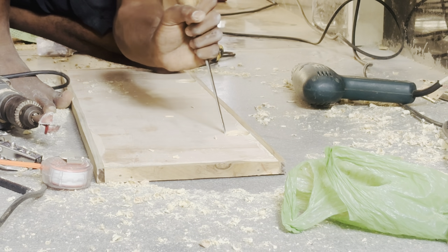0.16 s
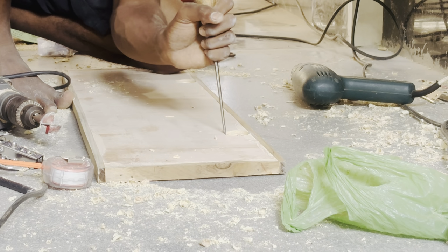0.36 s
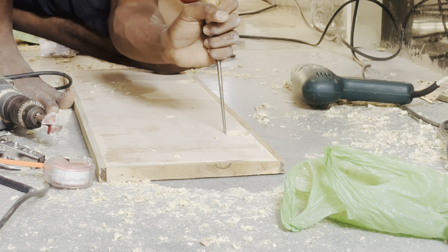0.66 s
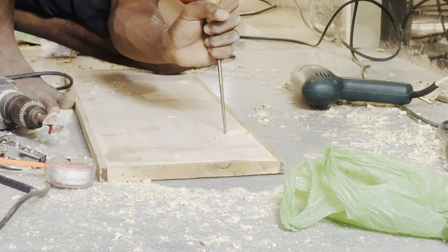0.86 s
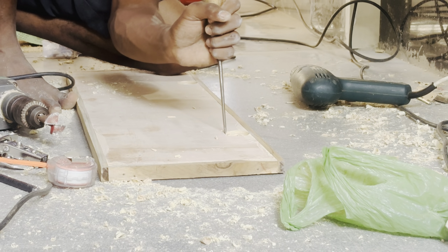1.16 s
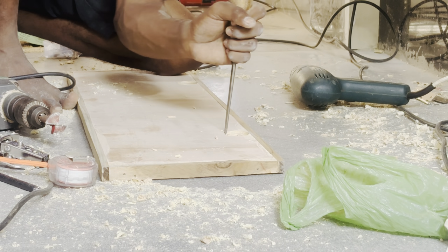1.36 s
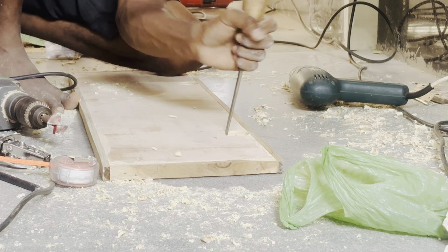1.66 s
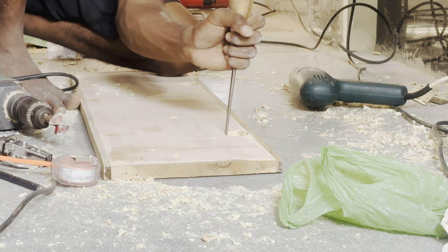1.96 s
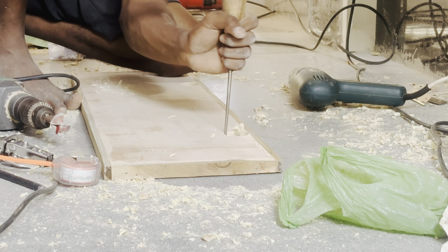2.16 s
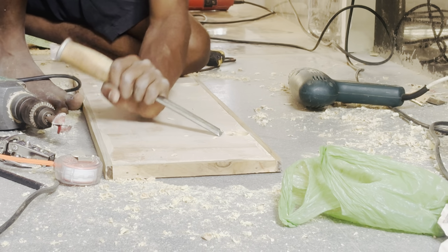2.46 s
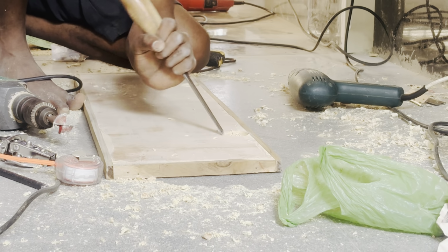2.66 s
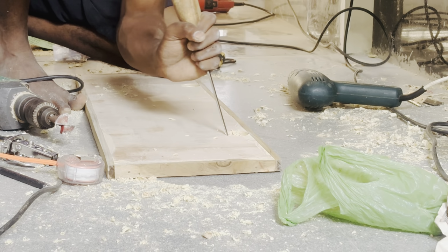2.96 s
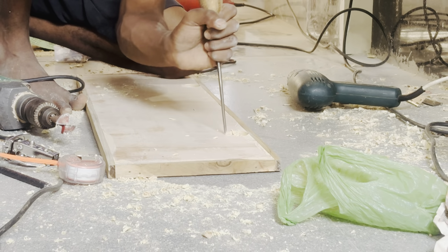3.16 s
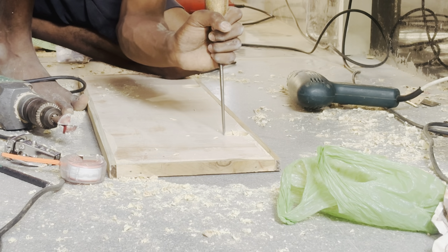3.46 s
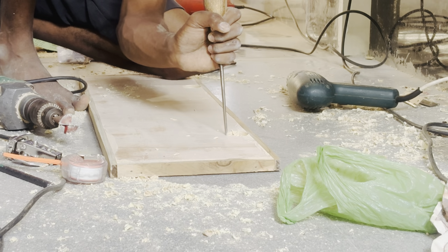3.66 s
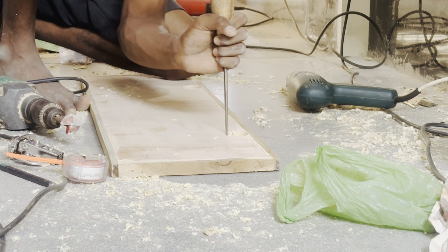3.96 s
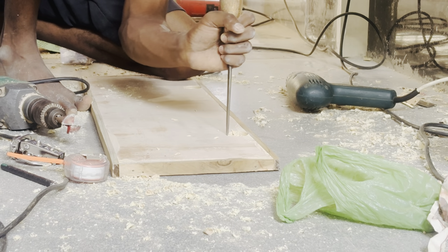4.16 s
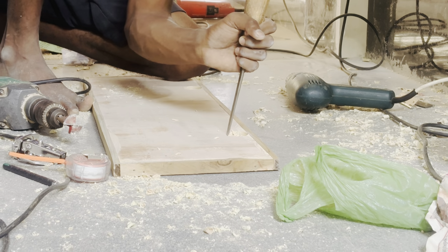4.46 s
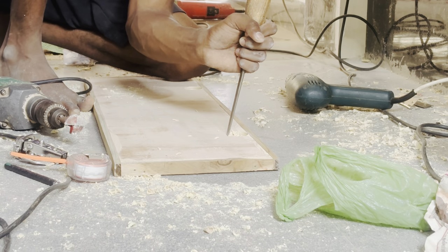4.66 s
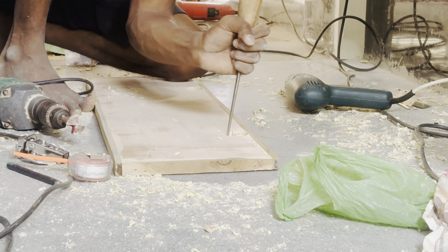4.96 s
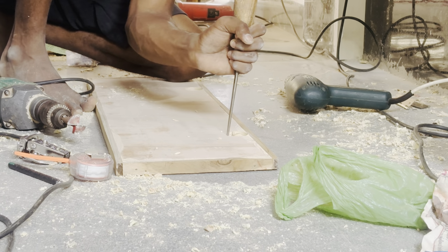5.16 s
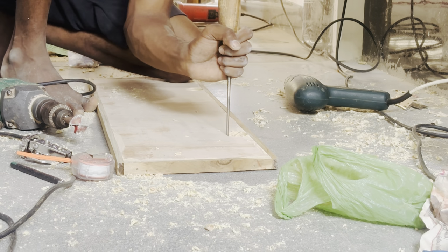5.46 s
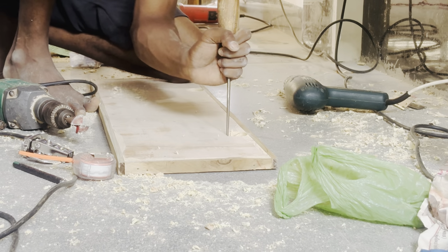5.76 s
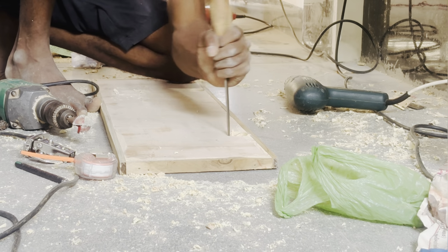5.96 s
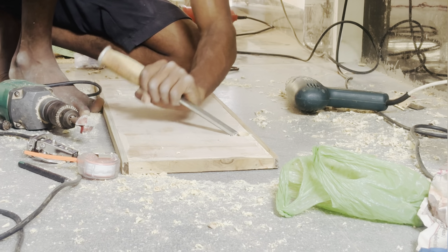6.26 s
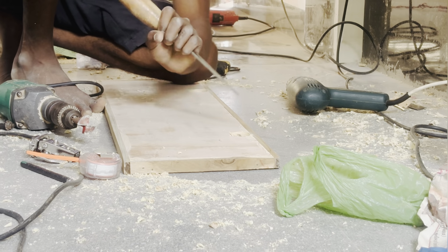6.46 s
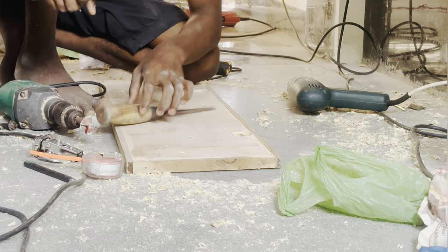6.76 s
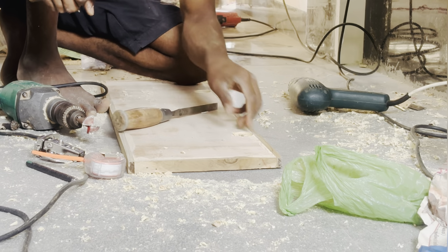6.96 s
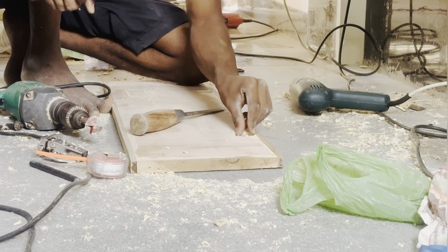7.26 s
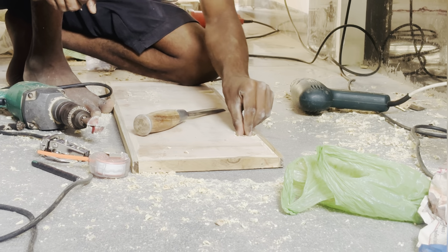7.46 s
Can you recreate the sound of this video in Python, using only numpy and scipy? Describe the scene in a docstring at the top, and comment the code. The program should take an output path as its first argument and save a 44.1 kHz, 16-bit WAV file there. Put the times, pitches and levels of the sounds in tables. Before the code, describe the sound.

A hammer cracks on a wooden chisel handle in a bare echoing room, two blows then three, before the chisel is dropped with a clinking knock.

```python
"""Hammer and chisel in a bare room

A hammer drives a wooden-handled chisel into a board on the concrete floor of a bare, echoing room.
Each blow is a short crackle that sets off a crack on the handle, a thump of the board and splitting fibres.
The chisel is also set, dropped and nudged: wood knocks and its blade rings as short damped tones.
Faint rasping, made of noise played at the speed of each stroke, carries from further off.
Steady filtered noise makes the low rumble, and noise that dies away makes the room's echo."""
import sys
import numpy as np
from scipy import signal
from scipy.fft import rfft, irfft, next_fast_len
from scipy.io import wavfile
from scipy.ndimage import map_coordinates

SR = 44100
rng = np.random.default_rng(int(sys.argv[2]) if len(sys.argv) > 2 else 0)


def transcribe(signal):
    """Save signal, clipped to [-1, 1], as a 16-bit WAV file at the path in sys.argv[1]."""
    frames = np.atleast_2d(signal).T
    limited = np.clip(frames, -1, 1)
    pcm = np.round(limited * 32767).astype(np.int16)
    wavfile.write(sys.argv[1], SR, pcm)


N = 335160

# Hammer blows: start_s, board_db, fibres_db, handle_db, crack_db, wood_pitch_ratio, direct_db, ping_hz, ping_db
BLOWS = [(1.6620, 0, -10, -0.5, 1, 0.94, 2, 3290, -2.5), (2.1079, 7, 5.5, 5.5, 5.5, 1.005, 1, 4390, -2.5),
         (4.8240, 8, -0.5, 6.5, 7, .98, 1, 3880, 9), (5.2548, 7.5, -3.5, 10, 8, 1.034, -3, 4160, -7),
         (5.6925, 8.5, 9, 8, 6.5, 0.98, -4.5, 3520, -10.5)]
# The chisel is set, dropped and nudged: start_s, soft_thud_db, wood_knock_db, blade_ring_db, tick_db
KNOCKS = [(.077, -31.5, -37, -58, -68), (.170, -62, -42.5, -45.5, -45), (3.425, -53, -49.5, -52, -51),
          (6.7612, -12.5, 4.5, -35, -34), (6.7855, -30, -11.5, -6, -24), (6.843, -41, -23.5, -34, -31),
          (6.865, -38, -29, -37, -32), (7.541, -58, -51, -55, -46)]
# Strokes of the distant rasping: start_s, length_s, friction_db, squeal_db, pitch_ratio
STROKES = [(3.49, .34, -67.5, -86, .84), (3.85, .13, -63.5, -82, .92), (3.965, .22, -54.5, -51, 1),
           (4.28, .13, -60, -73, .95), (4.4, .41, -54.5, -58.5, .99), (6.31, .42, -58.5, -70, .93),
           (7.26, .32, -56.5, -58, .92)]

# Resonances of the board, the handle, the wood in a chisel knock, and the free blade:
# pitch_hz, width_hz, level_db
BOARD_MODES = [(130, 75, -14), (255, 41, -13.5), (420, 30, -8), (577, 180, -1.5), (640, 81, 1),
               (716, 65, -0.5), (957, 90, -2)]
HANDLE_MODES = [(2090, 430, -1), (2510, 500, -3), (3300, 790, 0), (3900, 600, -4.5), (4440, 230, -6.5)]
KNOCK_WOOD_MODES = [(562, 110, -9.5), (718, 62, -1), (960.3, 70, 2), (1225, 135, -13), (1475, 140, -9.5),
                    (1960, 240, -9), (2440, 370, -11.5), (3200, 300, -15), (4300, 300, -24.5)]
BLADE_MODES = [(3500, 170, 0), (4250, 150, -10), (5230, 190, -2), (5950, 140, -7), (6700, 45, -2),
               (6970, 120, -8), (7600, 150, -15), (8560, 110, -5), (9400, 150, -17), (10300, 100, -8),
               (11200, 100, -21), (12050, 110, -21), (12750, 120, -20), (13800, 120, -22),
               (14600, 150, -23)]

# Tone of splitting fibres: pitch_hz, level_db
FIBRES_TONE = [(100, -36), (500, -19.5), (850, -6), (1100, 0), (1600, -4), (2200, -8), (3200, -21),
               (8000, -31.5)]
# Tone of the crack where hammer meets handle: pitch_hz, level_db
CRACK_TONE = [(100, -22.5), (1500, -9), (4500, 1.5), (7000, -2), (9500, -5.5), (12500, -7), (15000, -9),
              (17000, -21)]
# Tone of the handle landing softly: pitch_hz, level_db
THUD_TONE = [(60, -24), (180, -9.5), (300, 0.5), (450, 1), (800, -13), (2000, -48), (8000, -60)]
# Tone of the blade ticking on the board: pitch_hz, level_db
TICK_TONE = [(100, -48), (1500, 3), (3500, 10), (4500, 9), (5600, -11.5), (7000, -2.5), (8800, -18),
             (10500, -67), (13000, -5), (16000, 2)]
# Tone of the rasping friction: pitch_hz, level_db
FRICTION_TONE = [(300, -27.5), (700, -18), (900, -16), (1080, -8), (1250, -14), (1650, -9), (2100, -1),
                 (2500, -17.5), (3000, -25.5), (3600, -19.5), (4600, -24), (7000, -27), (10000, -33),
                 (13000, -33), (16000, -43.5)]
# Tone of the squeal in a rasping stroke: pitch_hz, level_db
SQUEAL_TONE = [(500, -39.5), (960, -24.5), (1040, -9), (1090, 1), (1170, -26), (1900, -26), (2080, -8.5),
               (2150, -1), (2240, -21), (3300, -39.5), (3600, -20), (3900, -41.5), (9000, -53)]
# Tone of the building's rumble and faint hiss: pitch_hz, level_db
RUMBLE_TONE = [(20, -36.5), (40, -23.5), (65, 3.5), (90, -1), (150, -10), (300, -17), (600, -17.5),
               (1200, -25), (3000, -30), (6000, -37.5), (10000, -41), (14000, -44), (17000, -53)]

# Tone of the room's echo: pitch_hz, level_db
ECHO_TONE = [(40, -6.5), (128, 0.5), (195, -9), (265, -2.5), (400, -5.5), (800, -3), (1500, -0.5),
             (3000, -2), (5000, -1.5), (7000, -5.5), (10000, -4), (14000, -7.5), (16000, -11.5)]
# Time the echo takes to fall by 60 dB: pitch_hz, t60_s
ROOM_T60 = [(80, 2.1), (210, 1.2), (560, 1.1), (1200, 1.087), (4000, .98), (7000, 0.83), (10000, 0.61),
            (15000, .52)]
# First echoes off floor, ceiling and walls, before the echo tone is applied: delay_s, level_db
FIRST_ECHOES = [(.0062, -23.5), (0.014, -14.5), (0.0157, -10), (.0265, -24), (.047, -18), (.105, -21)]
# Standing waves of the room: pitch_hz, level_db, t60_s
STANDING_WAVES = [(127, -4.5, 1.9), (269, -2, 0.36), (602, -5, .8), (731, 0, .95), (787, 0, .9),
                  (1122, -1, 0.47), (1374, -5.5, .8), (1478, 0.5, 0.3), (1529, -1, .8), (1658, -1, 0.71),
                  (1682, -3.5, 0.66), (2050, -2.5, 0.98), (2127, -2, .9)]
# Strength of the left-right difference (side) against the shared part (mid): pitch_hz, side_minus_mid_db
WIDTH = [(60, -20), (150, -14), (350, -5.5), (700, -2), (1400, -2.5), (2100, -11), (3500, -26.5),
         (15000, -30.5)]
# Phase lead of the left microphone over the right: pitch_hz, lead_radians
PORT_PHASE = [(100, 0), (2000, 0), (2800, .2), (4000, .05), (5100, 0), (5600, -.8), (6500, -.05),
              (7400, -.2), (10050, -3.14), (12400, -6.1), (13200, -6.5), (15200, -9.3)]

TOP_HZ = 16300  # treble cut
STROKE_ATTACK_S, STROKE_RELEASE_S = .055, .22
STROKE_END_SPEED = .6  # share of the top speed left when the push ends
PITCH_SAG = .04  # share of the pitch lost at standstill
SQUEAL_POWER = 4  # the squeal grows with this power of the speed
TIME = np.arange(N) / SR
HIT_TIME, ROOM_TIME = TIME[:SR // 2], TIME[:2 * SR]
GRID_HZ = np.arange(10, SR / 2, 10)


def blow(board_db, fibres_db, handle_db, crack_db, ratio):
    """The hammer cracks on the handle; the edge thumps the board and splits fibres."""
    parts = [
        (board_db, resonant(BOARD_MODES, ratio)),
        (fibres_db, broad(FIBRES_TONE)),
        (handle_db, resonant(HANDLE_MODES, ratio)),
        (crack_db, broad(CRACK_TONE)),
    ]
    return excite(contact(t60=.018, rise=.0004), parts)


def ping(hz, t60=.018):
    """The steel shank rings for a moment before the hand and the wood damp it."""
    return ring([(hz, 0, t60)], HIT_TIME)


def knock(thud_db, wood_db, blade_db, tick_db):
    """The loose chisel meets the board: the handle lands softly, the free blade clinks at once."""
    wood_parts = [(thud_db, broad(THUD_TONE)), (wood_db, resonant(KNOCK_WOOD_MODES))]
    steel_parts = [(blade_db, resonant(BLADE_MODES)), (tick_db, broad(TICK_TONE))]
    wood = excite(contact(t60=.031, rise=.0018), wood_parts)
    steel = excite(contact(t60=.018, rise=.00036), steel_parts)
    return wood + steel


def contact(t60, rise, count=6):
    """A short dense crackle (times in s), evened out so that it has no pitch of its own."""
    t = HIT_TIME[:int(t60 * SR)]
    crackle = rng.standard_normal(len(t)) * fade(t, t60) * (1 - np.exp(-t / rise))
    for _ in range(count):
        # keep the timing (phase) but make all pitches equally strong, then trim
        phase = np.angle(rfft(crackle, 4 * len(t)))
        crackle = irfft(np.exp(1j * phase))[:len(t)]
    return unit(np.pad(crackle, (0, len(HIT_TIME) - len(t))))


def excite(force, parts):
    """A contact force drives several (level dB, power spectrum) parts at once."""
    power = sum(undb(db) ** 2 * part for db, part in parts)
    return colour(force, np.c_[GRID_HZ, 10 * np.log10(power)])


def resonant(modes, ratio=1):
    """Power spectrum (mean one) of damped resonances, with their pitch scaled by ratio."""
    hz = GRID_HZ / ratio
    power = 0
    for mode_hz, width_hz, db in modes:
        detuning = (hz ** 2 - mode_hz ** 2) / (hz * width_hz)
        power = power + undb(db) ** 2 / (1 + detuning ** 2)
    return power / power.mean()


def broad(points):
    """Power spectrum (mean one) of a sound spread over many pitches."""
    power = undb(lookup(points, GRID_HZ)) ** 2
    return power / power.mean()


def rasp(flutter_db=3.0, flutter_hz=30):
    """Distant strokes rub fast, then slow: level and pitch follow speed, and the squeal peaks when fastest."""
    out = np.zeros(N)
    friction_noise, squeal_noise = noise(FRICTION_TONE), noise(SQUEAL_TONE)
    for start, length, friction_db, squeal_db, ratio in STROKES:
        corners = start + np.array([0, STROKE_ATTACK_S, length, length + STROKE_RELEASE_S])
        speed = np.interp(TIME, corners, [0, 1, STROKE_END_SPEED, 0])
        # slower travel through the noise lowers its pitch
        travel = np.cumsum(ratio * (1 - PITCH_SAG * (1 - speed)))
        friction = map_coordinates(friction_noise, [travel], order=3, mode="wrap")
        squeal = map_coordinates(squeal_noise, [travel], order=3, mode="wrap")
        out += undb(friction_db) * speed * friction
        out += undb(squeal_db) * speed ** SQUEAL_POWER * squeal
    return out * undb(flutter_db * wander(flutter_hz))


def wander(rate):
    """A random level that glides to a new value rate times a second."""
    return np.interp(TIME * rate, np.arange(N), rng.standard_normal(N))


def room(standing_db=-14):
    """Stereo response of the bare room: dense echo, first echoes and standing waves."""
    mid, side = diffuse(), diffuse()
    for delay, db in FIRST_ECHOES:
        add(mid, delay, undb([db]))
    mid = mid + undb(standing_db) * ring(STANDING_WAVES, ROOM_TIME)
    return stereo(colour(mid, ECHO_TONE), colour(side, ECHO_TONE))


def diffuse(gap=.0095, build=.0016):
    """Dense reflections build up (s) after a short gap (s) and die sooner in the treble."""
    hz = np.fft.rfftfreq(len(ROOM_TIME), 1 / SR)
    white = rfft(rng.standard_normal(len(ROOM_TIME)))
    centres, t60s = np.transpose(ROOM_T60)
    tail = np.zeros(len(ROOM_TIME))
    # each row of the identity matrix picks one band, which overlaps its neighbours
    for pick, t60 in zip(np.eye(len(centres)), t60s):
        band = irfft(white * lookup(np.c_[centres, pick], hz))
        tail += band * fade(ROOM_TIME, t60)
    onset = 1 - np.exp(-np.maximum(ROOM_TIME - gap, 0) / build)
    return unit(tail * onset)


def rumble(db=-66.0):
    """Low rumble and faint hiss of the building: steady noise."""
    return stereo(noise(RUMBLE_TONE), noise(RUMBLE_TONE)) * undb(db)


def noise(points):
    """Coloured noise with an average (rms) level of one."""
    return unit(colour(rng.standard_normal(N), points)) * np.sqrt(N)


def ring(modes, t):
    """Fading tones of alternating sign, each scaled to its level before they are summed."""
    total = np.zeros(len(t))
    for k, (hz, db, t60) in enumerate(modes):
        tone = unit(np.sin(2 * np.pi * hz * t) * fade(t, t60))
        total += (-1) ** k * undb(db) * tone
    return unit(total)


def stereo(mid, side):
    """Left and right differ mostly in the lower mids."""
    side = colour(side, WIDTH)
    return np.array([mid + side, mid - side])


def colour(x, points):
    """Filter to a (Hz, dB) tone, acting only after each input moment (minimum phase)."""
    size = 2 * next_fast_len(len(x))
    gain = undb(lookup(points, np.fft.rfftfreq(size, 1 / SR)))
    # folding the cepstrum forward in time gives the minimum-phase filter
    cepstrum = irfft(np.log(gain))
    cepstrum[1:size // 2] *= 2
    cepstrum[size // 2 + 1:] = 0
    response = np.exp(rfft(cepstrum))
    return irfft(rfft(x, size) * response)[:len(x)]


def lookup(points, hz):
    """Read (Hz, value) points on a log-frequency axis."""
    point_hz, value = np.transpose(points)
    return np.interp(np.log(np.maximum(hz, 1)), np.log(point_hz), value)


def fade(t, t60):
    """Exponential decay by 60 dB in t60 seconds."""
    return np.exp(-np.log(1000) * t / t60)


def undb(db):
    """Decibels to gain."""
    return 10 ** (np.asarray(db) / 20)


def unit(x):
    """Scale to an energy of one."""
    return x / np.sqrt(np.sum(x ** 2))


def add(track, s, sound):
    """Mix a sound into the track at s seconds."""
    start = max(int(s * SR), 0)
    part = sound[:max(N - start, 0)]
    track[start:start + len(part)] += part


def scene(wet_db=5.5, ping_wet_db=-13, knock_direct_db=2.5, rasp_wet_db=-4, rasp_direct_db=-5,
          earlier_db=-3, earlier_s=.66, lean_db=1.86):
    """Blows, knocks and rasping arrive directly and through the room (wet), over the rumble."""
    direct, sent, walls = np.zeros(N), np.zeros(N), room()
    for s, *strike, direct_db, ping_hz, ping_db in BLOWS:
        wood = blow(*strike)
        steel = undb(ping_db) * ping(ping_hz)
        add(sent, s, wood + undb(ping_wet_db) * steel)
        add(direct, s, undb(direct_db) * wood + steel)
    for s, *parts_db in KNOCKS:
        sound = knock(*parts_db)
        add(sent, s, sound)
        add(direct, s, undb(knock_direct_db) * sound)
    far = rasp()
    sent = undb(wet_db) * sent + undb(rasp_wet_db) * far
    direct = direct + undb(rasp_direct_db) * far

    # the direct sound leans to the left
    leaning = direct * undb([[lean_db / 2], [-lean_db / 2]])
    echoed = signal.fftconvolve(sent[None], walls, axes=1)[:, :N]
    out = leaning + echoed

    # the room still rings from a blow struck just before the scene opens
    earlier = blow(board_db=6, fibres_db=-2, handle_db=7.5, crack_db=3, ratio=1)
    for channel, wall in zip(out, walls):
        leftover = signal.fftconvolve(earlier, wall)[int(earlier_s * SR):]
        add(channel, 0, undb(wet_db + earlier_db) * leftover)
    return out + rumble()


def record(dry):
    """The two ports drift out of phase in the treble; the loudest peaks are rounded and the top is cut."""
    size = next_fast_len(N + SR // 2, real=True)
    lead = lookup(PORT_PHASE, np.fft.rfftfreq(size, 1 / SR))
    turn = np.exp(.5j * np.array([lead, -lead]))  # half the lead to each side
    ports = irfft(rfft(dry, size) * turn, size)[:, :N]
    ceiling = 1.1
    rounded = ceiling * np.tanh(ports / ceiling)
    top_cut = signal.ellip(8, .2, 70, TOP_HZ, fs=SR, output="sos")
    return signal.sosfilt(top_cut, rounded)


dry = scene()
out = record(dry)
transcribe(out)
```